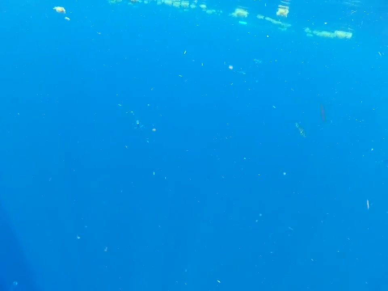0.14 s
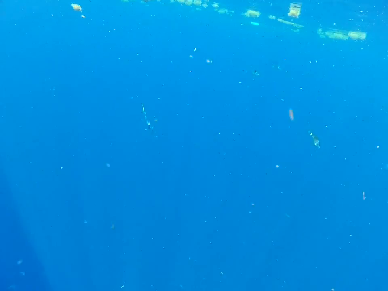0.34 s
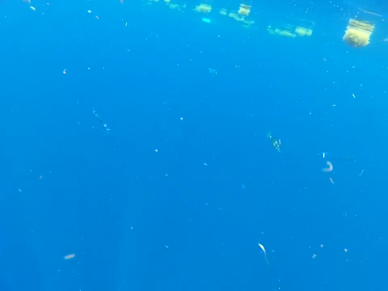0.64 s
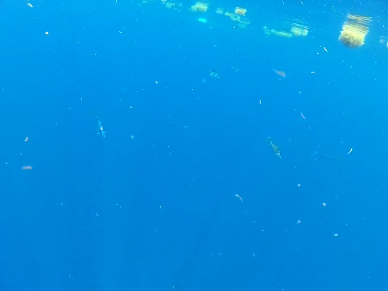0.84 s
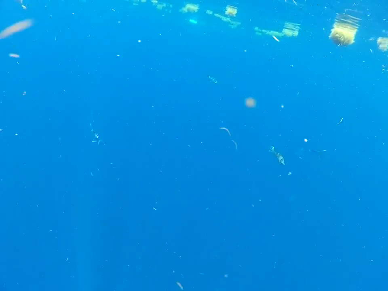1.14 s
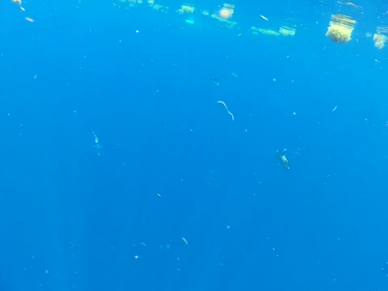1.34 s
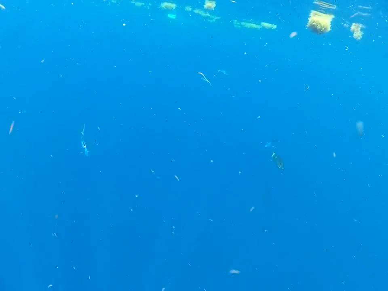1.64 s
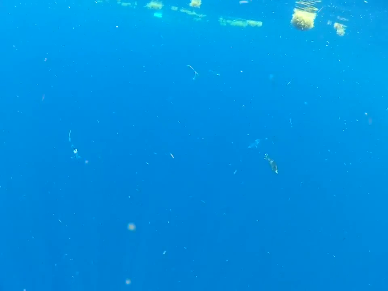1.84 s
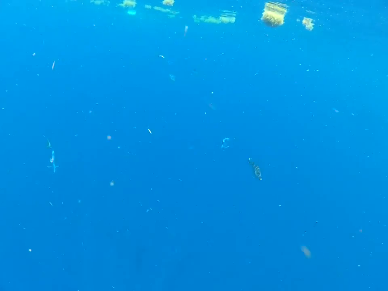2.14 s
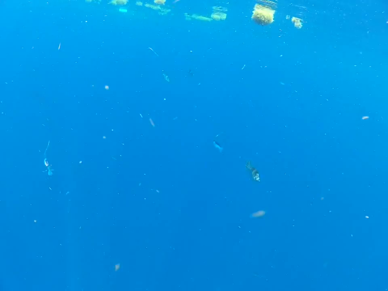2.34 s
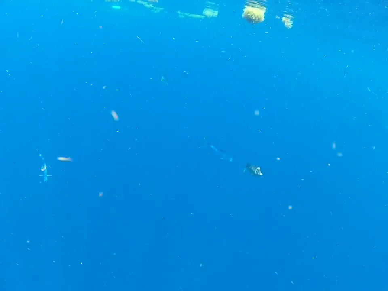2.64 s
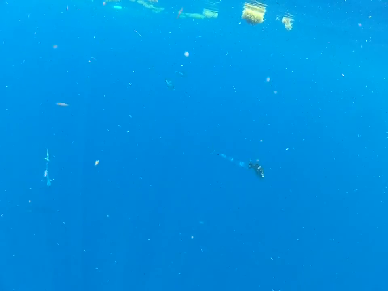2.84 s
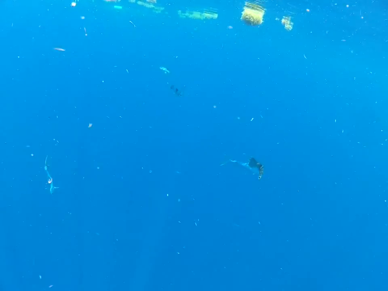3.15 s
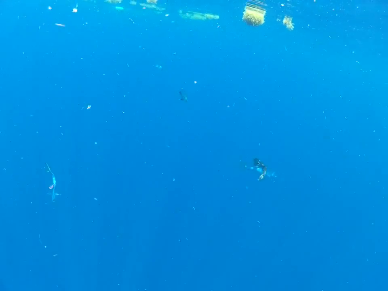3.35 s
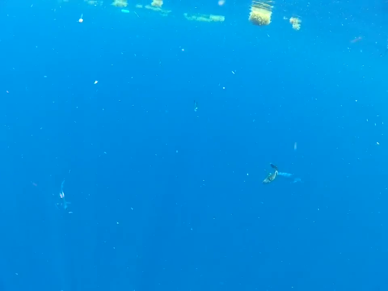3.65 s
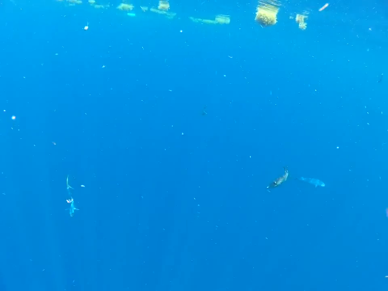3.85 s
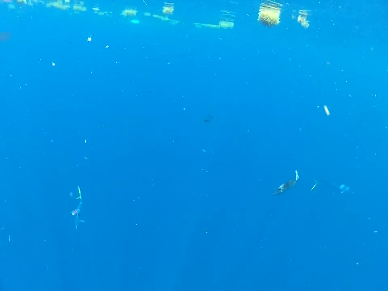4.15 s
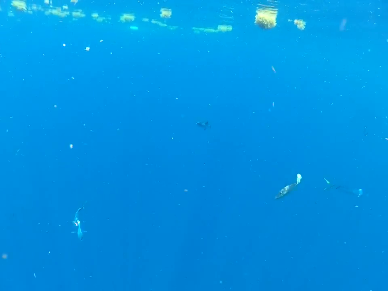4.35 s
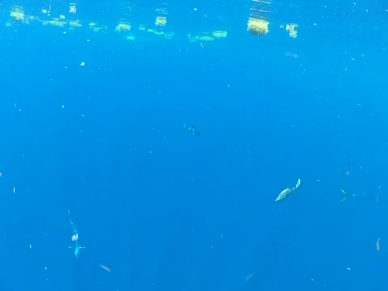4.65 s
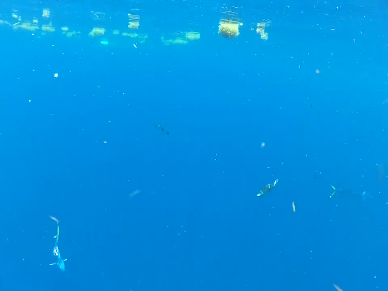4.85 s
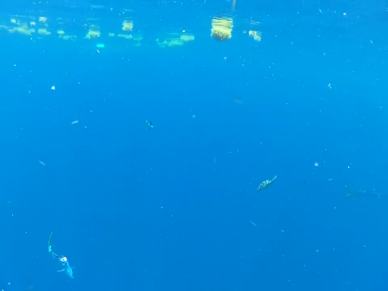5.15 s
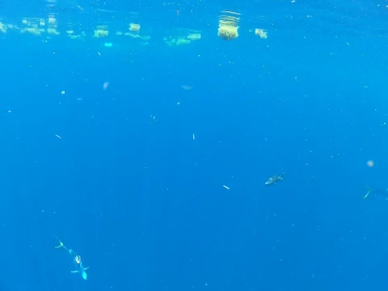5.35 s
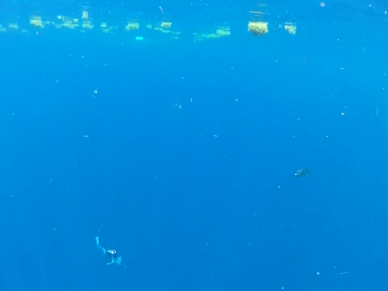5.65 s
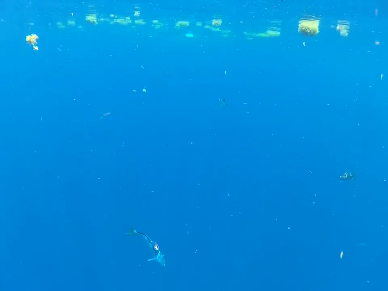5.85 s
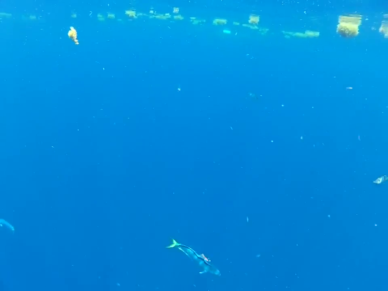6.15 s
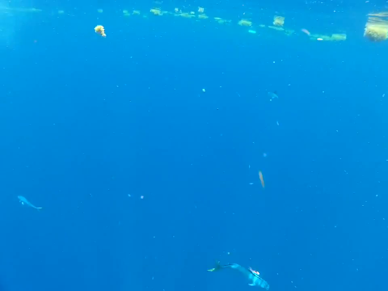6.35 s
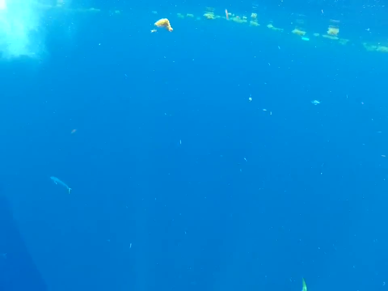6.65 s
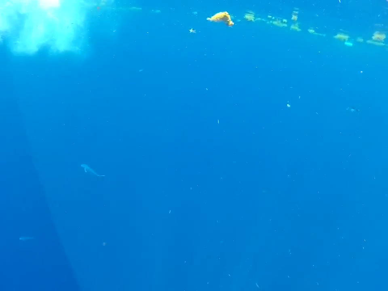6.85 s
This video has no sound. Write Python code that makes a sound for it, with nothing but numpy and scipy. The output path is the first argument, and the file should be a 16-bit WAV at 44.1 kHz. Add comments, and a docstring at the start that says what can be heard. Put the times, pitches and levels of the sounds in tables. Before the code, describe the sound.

Low booms, finger scuffs, plastic creaks and one sharp crack come from a hand gripping a waterproof camera case in open water. Behind them a muffled boat engine idles, then rises in pitch and loudness to a peak midway, with a hollow wash and faint ticking of tiny bubbles. As it drops back there is a single bubble and a small gurgle, then more soft bumps and a tap near the end.

```python
"""Under open water, heard from inside a waterproof camera case, a boat engine idles. In the first second
the hand holding the case makes it boom, scuff, creak and crack, and weaker bumps follow. The engine
labours and revs up to a peak at 3.6 s, its wash swelling through the resonances of the case. As it
settles, a bubble sounds and the water gurgles; the hand bumps again and taps once at 6.4 s. Throughout,
the recorder samples slowly and holds each sample, which mirrors the sound faintly into the treble."""
import sys
import numpy as np
from scipy import signal
from scipy.io import wavfile

SR = 44100
rng = np.random.default_rng(int(sys.argv[2]) if len(sys.argv) > 2 else 0)


def master_out(mix):
    """Clip the mix to full scale and print it as 16-bit PCM to the path in sys.argv[1]."""
    frames = np.transpose(np.atleast_2d(mix))
    ceiling = np.clip(frames, -1, 1)
    pcm = np.round(ceiling * 32767).astype(np.int16)
    wavfile.write(sys.argv[1], SR, pcm)


N = 308259
TIME = np.arange(N) / SR

# Engine speed. Each row: time in seconds, firing rate in Hz.
FIRING_RATE = [(0.0, 30.83), (1.05, 30.8), (1.71, 32.7), (1.87, 32.54), (2.41, 35.23), (2.61, 37.8),
               (2.96, 38.77), (3.6, 46.12), (4.28, 42.74), (4.87, 36.02), (5.16, 35.63), (6.07, 37.05),
               (6.52, 35.43), (6.99, 36.3)]
# Strong engine orders. Each row: multiple of the firing rate, base level in dB, gain in dB at full load,
# gain in dB at the shaking speed, gain in dB per Hz above IDLE_HZ, waver in dB.
MAIN_ORDERS = [(1, -45, 3.5, 9.5, 0.1, 3), (2, -50.5, 19.5, 5, 0.5, 1.8), (3, -52, 2.5, 2, 0.95, 2.5)]
# Weak engine orders. Each row: multiple of the firing rate, unloaded level in dB relative to the wash.
WEAK_ORDERS = [(1.5, -9), (2.5, -11.5), (3.5, -10.5), (4, -15.5), (4.5, -20), (5, -19)]
# Modes of the case. Each row: frequency in Hz, width in Hz, gain in dB under water drive, and when struck.
CASE_MODES = [(346, 195, 1, -10.5), (464, 102, -2.5, -11), (554.6, 66, 3.5, -5), (637, 59, -4, -11.5),
              (912, 102, -6.5, 4.5), (1078, 226, -8, -1.5), (1402, 185, -11.5, 1), (1682, 145, -20.5, -18),
              (2073, 316, -11, 9.5), (2295, 180, -11, 2), (2674, 100, -23.5, -21), (2890, 176, -16, 7),
              (3446, 435, -24.5, -1), (3833, 113, -26.5, 2.5), (4216, 300, -27.5, 2),
              (5090, 1840, -30.5, -26)]
# Gurgles close by. Each row: start in seconds, level in dB, rise time in seconds.
WATER_GURGLES = [(4.828, -47, .004), (4.845, -51, 0.0089)]
# Soft pushes of the hand; the long row at 2.5 s is instead a brief groan near 180 Hz, as the labouring engine's
# fifth order passes a resonance of the case. Each row: start in seconds, peak in dB, frequency in Hz, rise time
# in seconds.
HAND_BUMPS = [(0.39, -10.5, 111, 0.019), (.46, -27.5, 186, 0.014), (0.472, -14, 97, 0.013),
              (.604, -15, 99.6, 0.02), (.765, -23, 105.4, 0.019), (1.185, -19.5, 103, .015),
              (1.813, -34, 116, 0.018), (1.869, -26, 98, 0.021), (1.938, -27, 102, 0.012),
              (2.201, -26, 100.4, 0.019), (2.5, -35.5, 180, 0.075), (5.635, -29, 108.6, 0.0083),
              (5.775, -34.5, 169, 0.018), (5.826, -22.5, 113, 0.017), (6.177, -29, 98.9, 0.011),
              (6.394, -18.5, 104, .011), (6.495, -20, 98.5, 0.018)]
# The snaps of one loud crack. Each row: start in seconds, peak in dB.
CRACK_SNAPS = [(.4470, -18), (.4484, -7), (.4494, -11), (.45025, -6.5), (.4523, -16), (.4528, -17)]
# Fingers rubbing the case. Each row: start in seconds, level in dB.
FINGER_SCUFFS = [(0.385, -26.5), (.406, -32.5), (0.45, -31.5), (.476, -33), (0.522, -36.5), (.594, -31.5),
                 (1.183, -38.5), (2.186, -39.5), (4.828, -37.5), (6.399, -35)]
# Creaks of the plastic. Each row: start in seconds, level of the first slip in dB.
PLASTIC_CREAKS = [(0.3852, -50.5), (.405, -48.5), (.451, -30), (.465, -35.5), (.516, -31.5), (0.545, -47),
                  (0.569, -44), (0.579, -36.5), (0.605, -37), (0.645, -47.5)]
# Low boom of water pushing on the case. Each row: time in seconds, level in dB before the boom's gain.
BOOM_LEVELS = [(0.0, -55.5), (0.64, -37), (0.8, -46.5), (1.6, -54), (2.37, -39.5), (2.96, -40.5),
               (3.29, -39.5), (5.47, -48), (6.37, -45.5), (6.52, -39), (6.99, -38)]
# The higher drone of the case. Each row: time in seconds, level in dB before the drone's gain.
DRONE_LEVELS = [(0.0, -63), (0.41, -57), (0.53, -50), (0.8, -59.5), (1.99, -56.5), (2.2, -52.5),
                (2.35, -47), (2.69, -45), (5.35, -62), (6.43, -54.5), (6.99, -59)]

IDLE_HZ, SHAKE_HZ, SHAKE_WIDTH_HZ = 36, 39.64, 3.1   # firing rates: settled idle, strongest shaking
LOAD_START_S, LOAD_FULL_S, LOAD_OFF_S, LOAD_RELEASE_S = 2.4, 3.13, 3.35, .23
WASH_IDLE_DB, WASH_DB_PER_OCTAVE = -48, 11.5


def engine(firing_hz, weak_load_db=8.5, weak_waver_db=6, jitter=.006):
    """Periodic firing gives harmonics, uneven cylinders half orders; load and resonance strengthen them."""
    release = np.exp(-np.maximum(TIME - LOAD_OFF_S, 0) / LOAD_RELEASE_S)
    load = np.interp(TIME, [LOAD_START_S, LOAD_FULL_S], [0, 1]) * release
    shake = 1 / (1 + ((firing_hz - SHAKE_HZ) / SHAKE_WIDTH_HZ) ** 2)
    phase = 2 * np.pi * np.cumsum(firing_hz * (1 + jitter * drift(17))) / SR
    orders = []
    for k, db, load_db, shake_db, db_per_hz, waver_db in MAIN_ORDERS:
        gain_db = load_db * load + shake_db * shake + db_per_hz * (firing_hz - IDLE_HZ)
        orders.append((k, db + gain_db + waver_db * drift(11)))
    for k, db in WEAK_ORDERS:
        orders.append((k, wash_level(firing_hz) + db + weak_load_db * load + weak_waver_db * drift(8)))
    return np.sqrt(2) * sum(from_db(db) * np.sin(k * phase + rng.uniform(0, 2 * np.pi)) for k, db in orders)


def wash_level(firing_hz):
    """The wash follows a power law: its level in dB rises equally with each doubling of engine speed."""
    return WASH_IDLE_DB + WASH_DB_PER_OCTAVE * np.log2(firing_hz / IDLE_HZ)


def wash(wash_db, flicker_db=1.23, gurgle_band_hz=(550, 1900)):
    """The modes of the case filter the noise of churning water; gurgles are short, duller bursts of it."""
    churn = rms_one(sum(from_db(db + flicker_db * drift(25)) * resonant_noise(hz, width)
                        for hz, width, db, _ in CASE_MODES))
    gurgle = rms_one(butterworth(churn, gurgle_band_hz, "band"))
    bursts = sum(from_db(db) * hump(s, rise_s) for s, db, rise_s in WATER_GURGLES)
    return from_db(wash_db) * churn + gurgle * bursts


def bumps(rebound_s=.044, rebound_db=-10.5):
    """A slow push excites only a low mode: the case booms, then rocks back once, more weakly."""
    return sum(swell(s, db, hz, rise_s) + swell(s + rebound_s, db + rebound_db, hz, rise_s)
               for s, db, hz, rise_s in HAND_BUMPS)


def crack():
    """Stressed plastic lets go in a few impulses, whose broad spectrum excites every mode."""
    force = np.zeros(N)
    for s, db in CRACK_SNAPS:
        force[round(s * SR)] += from_db(db)
    return strike(force)


def scuffs(body_db=-4, decay_s=0.027):
    """Skin is soft, so its friction drives only the low resonances."""
    rub = rms_one(sum(from_db(db) * resonant_noise(hz, width) for hz, width, _, db in CASE_MODES[:4]))
    body = from_db(body_db) * rms_one(resonant_noise(hz=241, width_hz=104))
    return rms_one(rub + body) * sum(from_db(db) * dying(s, decay_s) for s, db in FINGER_SCUFFS)


def creaks(grains_per_s=4000, dull_hz=2200):
    """Stick-slip friction: each slip is a rush of tiny impulses, softer and duller than a snap."""
    grains = (rng.random(N) < grains_per_s / SR) * rng.choice([-1, 1], N)
    friction = butterworth(grains, dull_hz)
    pressure = sum(slip_run(s, db) for s, db in PLASTIC_CREAKS)
    return strike(friction * pressure) / strike(friction).std()


def slip_run(s, db, count=7, gap_s=0.0072, unevenness=0.34, loss_db=5.5, rise_s=0.0019):
    """Stress relaxes in steps: the envelope of a creak is a run of unevenly spaced, weakening slips."""
    gaps = gap_s * np.exp(unevenness * rng.standard_normal(count))
    starts = s + np.cumsum(gaps) - gaps
    return sum(from_db(db - loss_db * k) * hump(start, rise_s) for k, start in enumerate(starts))


def tap(start_s=6.3995, force_db=-15, soft_hz=1150):
    """A soft fingertip spreads its impact over time, which takes the treble out of the force."""
    click = signal.unit_impulse(N, round(start_s * SR))
    return from_db(force_db) * strike(butterworth(click, soft_hz))


def flow(boom_gain_db=1.5, drone_gain_db=2.0, surge_db=-48.5, hum_db=-48, hum_hz=52):
    """Forced vibration: moving water keeps the lowest modes of the case rumbling, over a faint hum."""
    boom = from_db(in_time(BOOM_LEVELS) + boom_gain_db) * rms_one(resonant_noise(hz=96.3, width_hz=34))
    drone = from_db(in_time(DRONE_LEVELS) + drone_gain_db) * rms_one(resonant_noise(hz=177.4, width_hz=91))
    surge = from_db(surge_db) * rms_one(resonant_noise(hz=30.5, width_hz=26.3))
    hum = from_db(hum_db + 2 * drift(1.7)) * np.sin(2 * np.pi * hum_hz * TIME)
    return boom + drone + surge + hum


def bubble():
    """A lone bubble pulsates briefly at its natural frequency."""
    return swell(s=4.001, db=-35.5, hz=1120, rise_s=.005)


def ticks(wash_db, per_s=45, relative_db=-3, spread_db=3):
    """Tiny bubbles pop as a Poisson process and ring the upper modes, harder when the water churns more."""
    onsets = rng.random(N) < per_s / SR
    pops = onsets * from_db(wash_db + relative_db + spread_db * np.clip(rng.standard_normal(N), -2, 2))
    upper_modes = [(hz, width, (-1) ** k * from_db(db))
                   for k, (hz, width, db, _) in enumerate(CASE_MODES[4:])]
    return ring(pops, upper_modes)


def strike(force):
    """A force on the shell drives all the modes of the case at once."""
    return ring(force, [(hz, width, from_db(db)) for hz, width, _, db in CASE_MODES])


def ring(force, modes):
    """Convolution with the summed impulse responses of the modes; a unit click gives a peak of 1."""
    click = signal.unit_impulse(SR // 20)
    response = sum(gain * resonate(click, hz, width) for hz, width, gain in modes)
    return signal.fftconvolve(force, response / np.abs(response).max())[:N]


def resonate(x, hz, width_hz):
    """A damped two-pole resonator with unit gain at its peak."""
    r = np.exp(-np.pi * width_hz / SR)
    feedback = [1, -2 * r * np.cos(2 * np.pi * hz / SR), r * r]
    return signal.lfilter(np.array([1, 0, -1]) * (1 - r * r) / 2, feedback, x + 1e-18)


def resonant_noise(hz, width_hz):
    """Two resonators in cascade narrow white noise to a steep-sided band."""
    return resonate(resonate(rng.standard_normal(N), hz, width_hz), hz, width_hz)


def swell(s, db, hz, rise_s):
    """A softly driven mode builds up and dies away."""
    return from_db(db) * hump(s, rise_s) ** 3 * np.sin(2 * np.pi * hz * (TIME - s))


def hump(s, rise_s):
    """A critically damped pulse: it reaches 1 after the rise time, then falls away."""
    age = np.clip((TIME - s) / rise_s, 0, 20)
    return age * np.exp(1 - age)


def dying(s, decay_s, attack_s=0.002):
    """Exponential decay with a quick linear attack."""
    age = np.maximum(TIME - s, 0)
    return np.minimum(age / attack_s, 1) * np.exp(-np.minimum(age / decay_s, 20))


def drift(per_s):
    """Interpolated random values give a slow wander with a spread of about 1."""
    knots = np.arange(0, TIME[-1] + 1, 1 / per_s)
    return np.interp(TIME, knots, rng.standard_normal(len(knots)))


def in_time(rows):
    """Linear interpolation of a curve at every sample."""
    return np.interp(TIME, *np.transpose(rows))


def from_db(db):
    """Decibels to amplitude ratio."""
    return 10 ** (np.asarray(db) / 20)


def rms_one(x):
    """Normalisation to unit rms."""
    return x / np.sqrt(np.mean(x ** 2) + 1e-20)


def butterworth(x, hz, kind="low"):
    """A gentle filter, falling 12 dB per octave outside its passband."""
    return signal.sosfilt(signal.butter(2, hz, kind, fs=SR, output="sos"), x)


def brick_wall(x, hz):
    """A steep linear-phase low-pass."""
    padded = np.pad(x, 150, "reflect", reflect_type="odd")
    return signal.fftconvolve(padded, signal.firwin(301, hz, fs=SR), "valid")


def scene():
    """Superposition of boat, hand and water at one microphone; the engine's speed drives its wash."""
    firing_hz = in_time(FIRING_RATE)
    wash_db = wash_level(firing_hz)
    hand = bumps() + scuffs() + crack() + creaks() + tap()
    water = flow() + bubble() + ticks(wash_db)
    return (engine(firing_hz) + wash(wash_db) + hand + water)[None]


def record(dry, hold_hz=12000, anti_alias_hz=5830, cutoff_hz=15150):
    """Zero-order hold: holding each slow sample mirrors the spectrum about the rate; the top is cut."""
    band_limited = brick_wall(dry[0], anti_alias_hz)
    slow = signal.resample_poly(band_limited, hold_hz, SR, window=("kaiser", 4), padtype="edge")
    held = signal.resample_poly(np.repeat(slow, 4), SR, 4 * hold_hz, padtype="edge")
    return brick_wall(held[:N], cutoff_hz)[None]


dry = scene()
out = record(dry)
master_out(out)
```